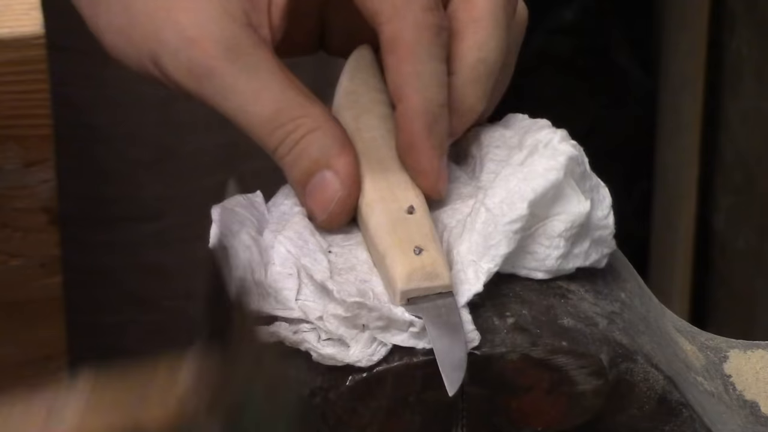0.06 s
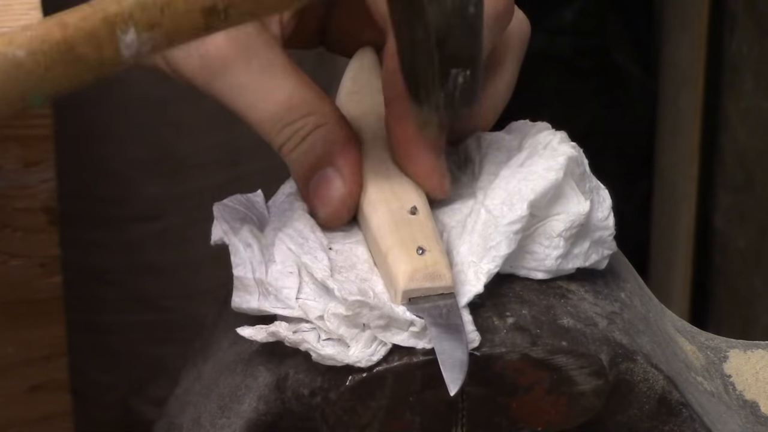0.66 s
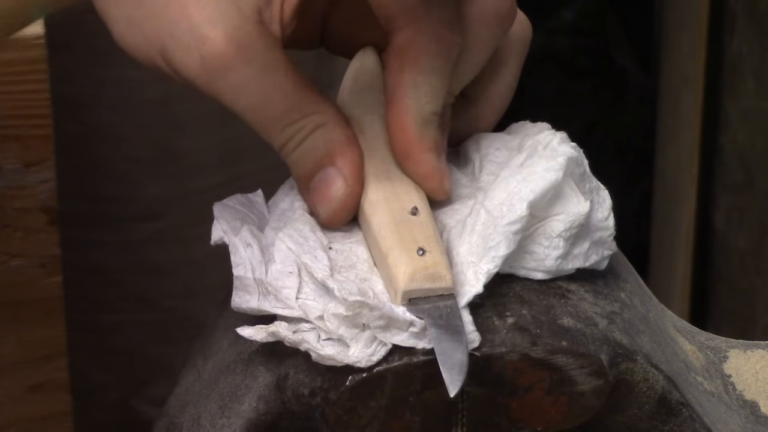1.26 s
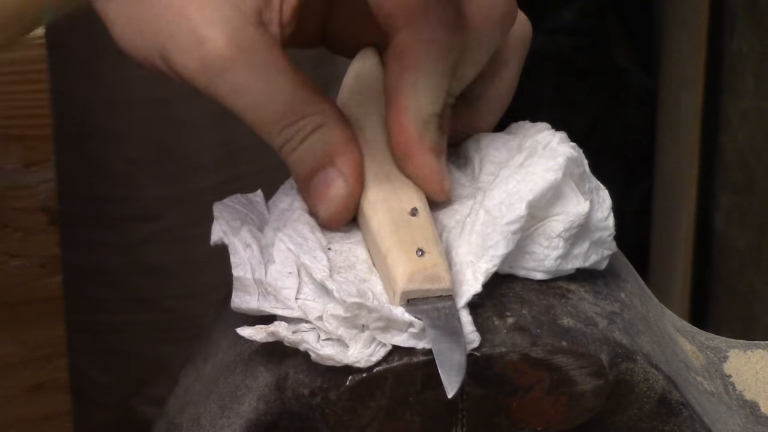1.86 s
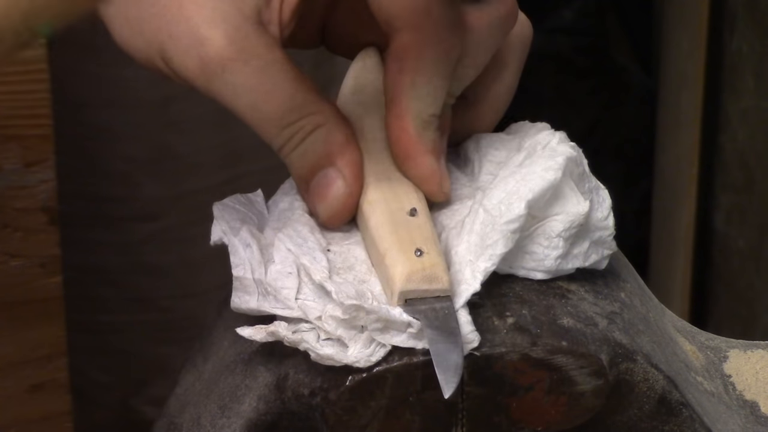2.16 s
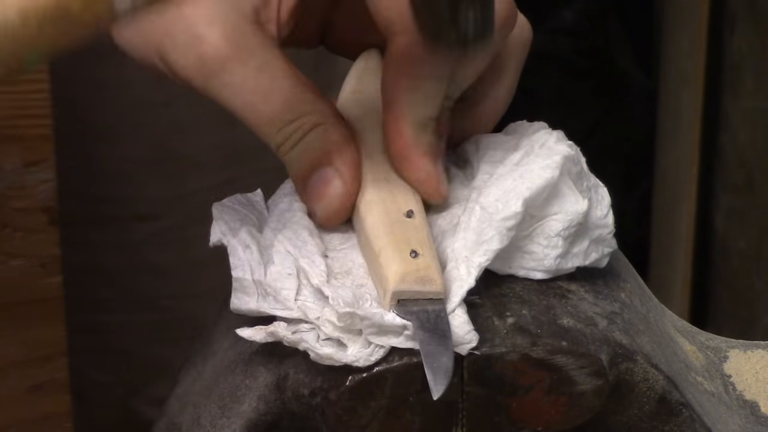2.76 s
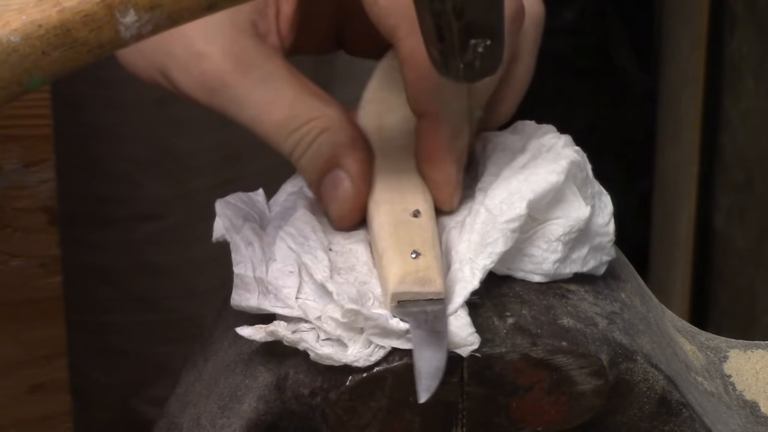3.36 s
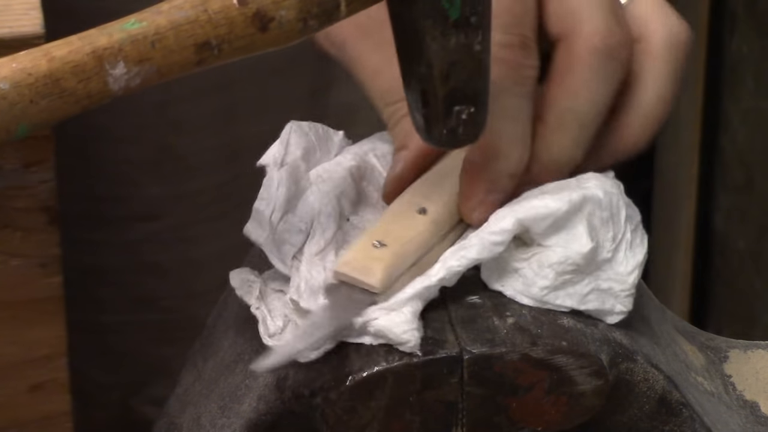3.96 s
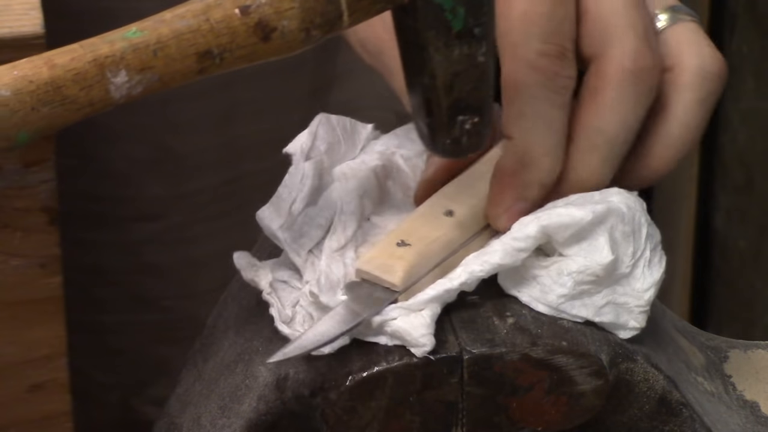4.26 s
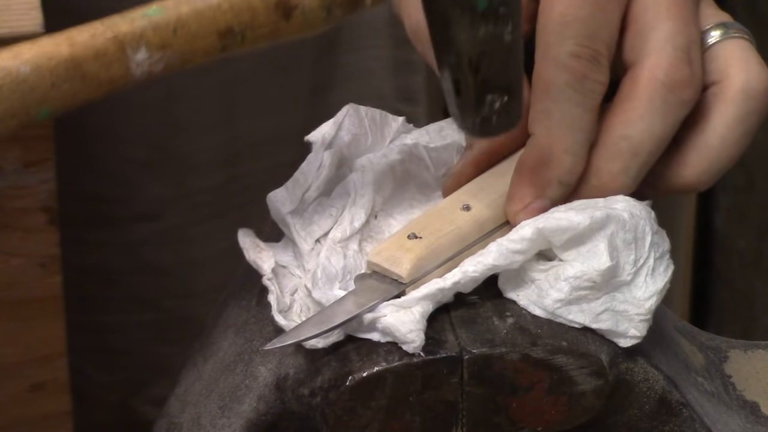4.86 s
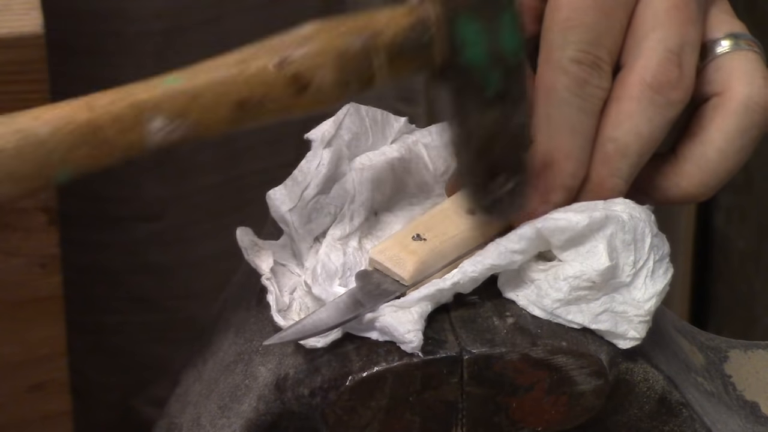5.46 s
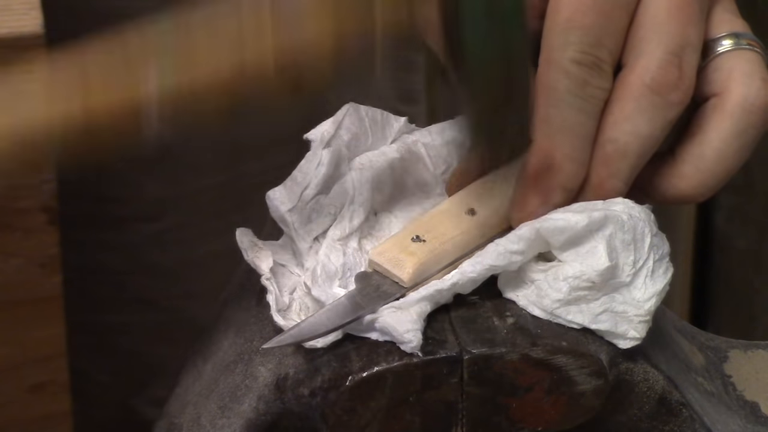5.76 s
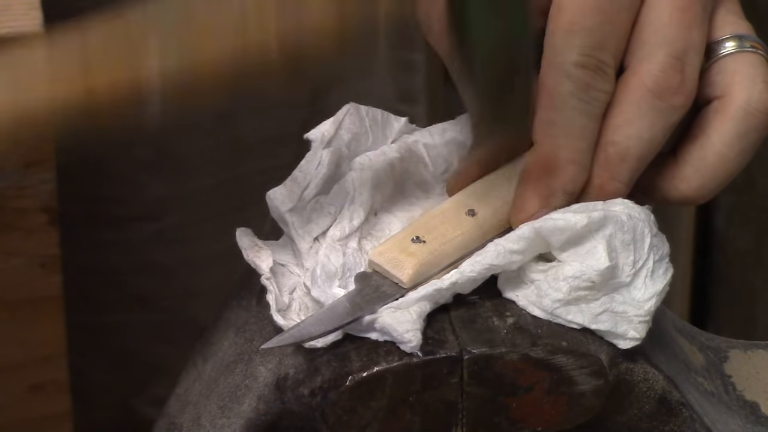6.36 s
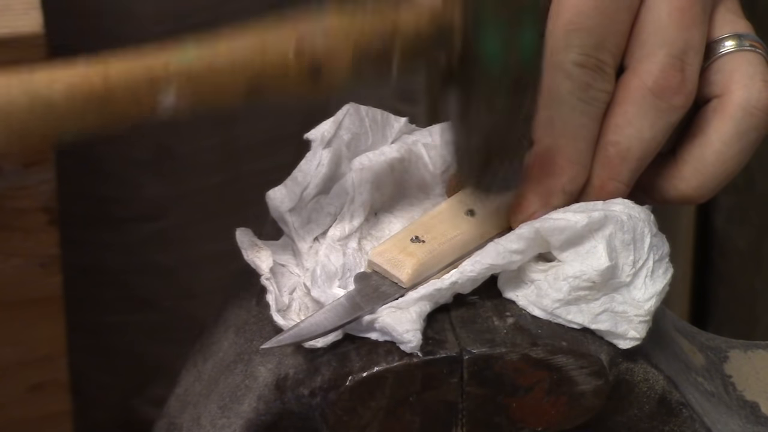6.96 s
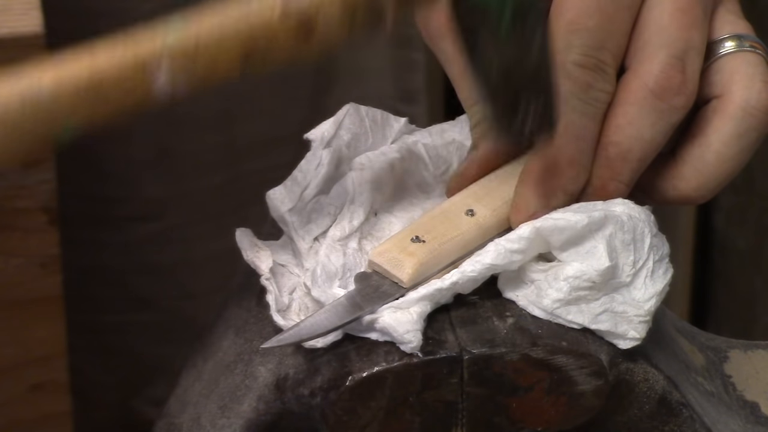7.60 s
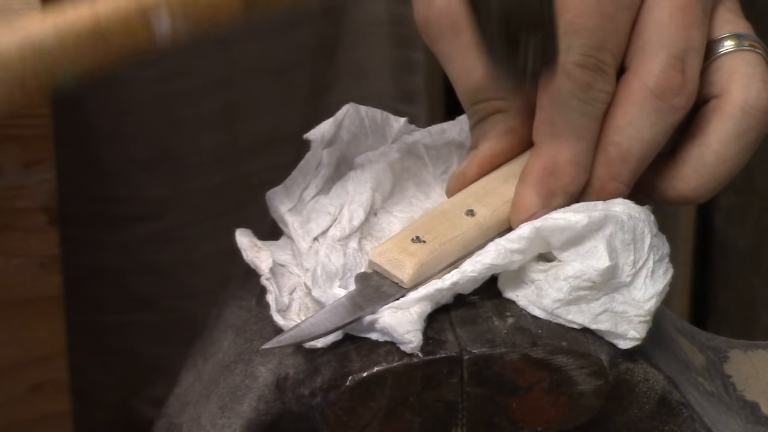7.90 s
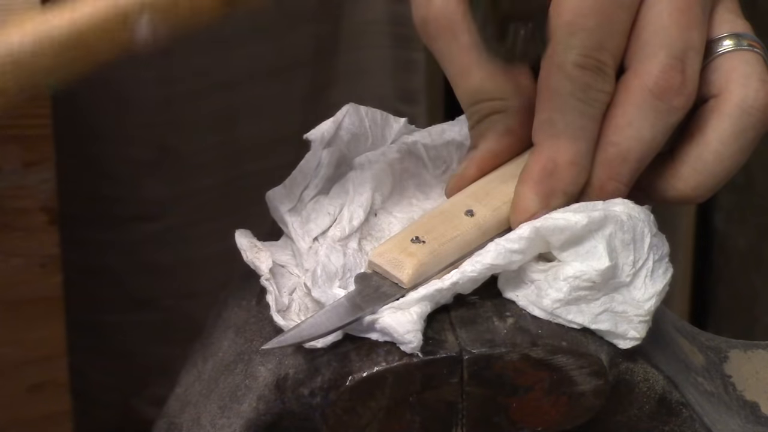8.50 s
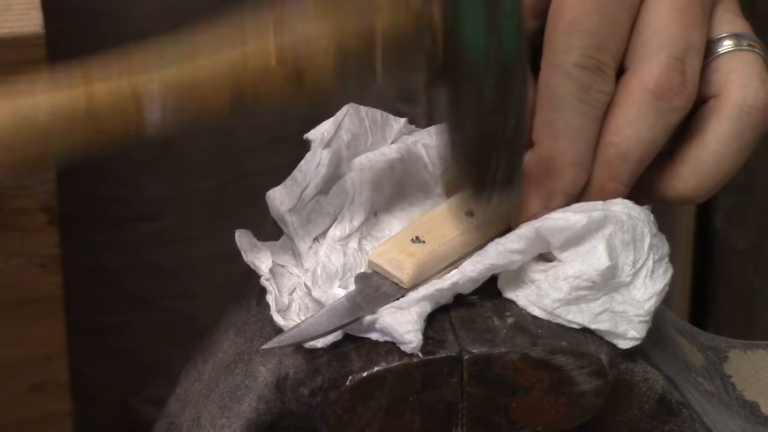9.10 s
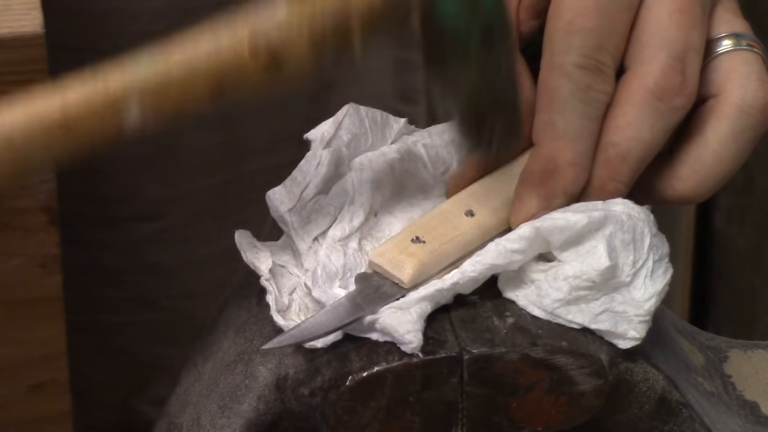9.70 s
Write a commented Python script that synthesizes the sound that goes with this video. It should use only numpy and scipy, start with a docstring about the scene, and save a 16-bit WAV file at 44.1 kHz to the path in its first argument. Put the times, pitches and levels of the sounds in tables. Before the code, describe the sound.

At the start, fingers rub softly and steel scrapes lightly as a knife is laid on a paper towel on a bench vise. From about 0.8 to 2.9 seconds, a small hammer strikes a metal pin in the wooden handle eight times, roughly three blows a second. Each is close and loud: a sharp woody crack, a low bench thump and a thin steel ring, with a short workshop reverberation. From 3 to 5 seconds the handle is turned, with quiet paper rustling, dull finger rubs, a very faint whine and one tiny squeak near 4.1 seconds. A light tap comes at 5.2 seconds. From 5.5 to 9.7 seconds, sixteen slightly faster blows land on the second pin, evenly paced but varying a little in strength and brightness. Faint background hiss sinks under the loud blows and slowly returns.

```python
"""A soft rub of fingers and a light steel scrape: a knife is laid on a paper towel on a bench vise.
A small hammer then peens two metal pins in its wooden handle, one run of blows each.
Each blow thumps the bench, cracks in the wood and leaves a thin steel ring; a small workshop answers.
Between the runs the handle is turned on the paper, with a rustle, a faint whine and one squeak.
Gain control ducks the loud blows, so the background hiss sinks and returns."""
import sys
import numpy as np
from scipy import signal
from scipy.fft import rfft, irfft, next_fast_len
from scipy.io import wavfile
from scipy.ndimage import uniform_filter1d

SR = 44100
rng = np.random.default_rng(int(sys.argv[2]) if len(sys.argv) > 2 else 0)


def master_out(mix):
    """Clip the mix to full scale and print it as 16-bit PCM to the path in sys.argv[1]."""
    frames = np.transpose(np.atleast_2d(mix))
    ceiling = np.clip(frames, -1, 1)
    pcm = np.round(ceiling * 32767).astype(np.int16)
    wavfile.write(sys.argv[1], SR, pcm)


N = 429534
TIME_S = np.arange(N) / SR
AGE_S = np.arange(int(1.2 * SR)) / SR  # time since a blow


def amp(db):
    """Decibels to gain."""
    return 10 ** (np.asarray(db) / 20)


def add(mix, start_s, sound):
    """Mixes a sound in at start_s."""
    part = mix[round(start_s * SR):][:len(sound)]
    part += sound[:len(part)]


def colour(x, hz, gains):
    """Filters x by gains joined on a log-frequency axis."""
    size = next_fast_len(len(x))
    bins_hz = np.fft.rfftfreq(size, 1 / SR)
    response = np.interp(np.log(bins_hz + 1), np.log(hz), gains)
    return irfft(rfft(x, size) * response, size)[:len(x)]


def noise(spectrum):
    """Steady shaped noise, rms 1."""
    hz, db = np.transpose(spectrum)
    grid_hz = np.geomspace(10, SR / 2, num=400)
    gains = amp(np.interp(np.log(grid_hz), np.log(hz), db))
    x = colour(rng.standard_normal(N), grid_hz, gains)
    return x / x.std()


def strokes(rows, fullness=0.87):
    """Envelope of hand movements: from rest to peak speed and back."""
    out = np.zeros(N)
    for start_s, length_s, db, crest in rows:
        peak_s = start_s + length_s * np.clip(crest, .05, .95)
        progress = np.interp(TIME_S, [start_s, peak_s, start_s + length_s], [0, .5, 1])
        out += amp(db) * abs(np.sin(np.pi * progress)) ** fullness
    return out


def friction(resonances):
    """Friction noise singing in narrow resonances."""
    out = 0
    for hz, width_hz, db in resonances:
        band = signal.lfilter(*signal.iirpeak(hz, hz / width_hz, fs=SR), rng.standard_normal(N))
        out += amp(db) * band / band.std()
    return out


def burst(bands):
    """Noise burst; each band has its own energy and decay."""
    hz, db, t60_s = np.transpose(bands)
    grain = rng.choice([-1., 1.], len(AGE_S))
    out = 0
    for band, gain, rate in zip(np.eye(len(hz)), amp(db), np.log(1000) / t60_s):
        decay = np.sqrt(2 * rate / SR) * np.exp(-rate * AGE_S)  # unit energy
        out += gain * decay * colour(grain, hz, band)
    return out


def ring(modes, travel_s=0):
    """Damped modes; low bending waves arrive later (travel_s: delay at 1 kHz)."""
    out = 0
    for hz, db, t60_s in modes:
        t = np.maximum(AGE_S - travel_s * np.sqrt(1000 / hz), 0)
        out += amp(db) * np.exp(-np.log(1000) * t / t60_s) * np.sin(2 * np.pi * hz * t)
    return out


# noise floor: (frequency [Hz], relative density [dB])
AIR_SPECTRUM = [(40, -6.5), (60, 3), (90, -10.5), (120, -1.5), (170, -11.5), (380, -18.5), (800, -24),
                (2600, -28), (6000, -33), (10000, -36.5), (16000, -37.5)]
def air(level_db=-56.5):
    """The quiet shop and the microphone's hiss."""
    return amp(level_db) * noise(AIR_SPECTRUM)


# grip shifts: (start [s], length [s], relative level [dB], crest position [0-1])
GRIP_STROKES = [(0.0, 0.2, -53, 0), (3.82, 0.53, -57.5, 0.18), (4.52, 0.49, -59.5, 0.38)]
# finger friction: (frequency [Hz], relative density [dB])
GRIP_SPECTRUM = [(100, -27), (200, 3), (320, 5.5), (700, -6.5), (1500, -13.5), (3000, -26)]
def finger_rub(gain_db=-1):
    """Fingers shift their grip with a dull rub."""
    return amp(gain_db) * strokes(GRIP_STROKES) * noise(GRIP_SPECTRUM)


# handle slides: (start [s], length [s], relative level [dB], crest position [0-1])
SLIDE_STROKES = [(0.0, .14, -68.5, .5), (3.195, 0.1, -54, 0.38), (3.38, 0.13, -60.5, .6),
                 (3.545, 0.022, -64.5, 0.4), (3.66, 0.14, -55, .6), (3.77, 0.3, -54.5, 0.16),
                 (4.11, 0.15, -52, 0.7), (4.22, 0.19, -64.5, .4), (4.41, 0.06, -65, 0.37),
                 (4.61, 0.096, -66.5, .5), (4.71, 0.16, -57, .75)]
# paper friction: (frequency [Hz], relative density [dB])
PAPER_SPECTRUM = [(530, -38), (900, -19), (1040, -9.5), (2140, -11.5), (2360, -5.5), (2830, -5),
                  (3510, -2.5), (13000, -23), (16000, -31)]
def towel_rustle(gain_db=1.5, grain_db=2):
    """Paper fibres catch and slip under the handle."""
    catch = uniform_filter1d(rng.standard_normal(N), size=150)
    flicker = amp(gain_db + grain_db * catch / catch.std())
    return flicker * strokes(SLIDE_STROKES) * noise(PAPER_SPECTRUM)


# blade movement: (start [s], length [s], level [dB], crest position [0-1])
SCRAPE_STROKES = [(0.16, 0.027, -57.5, .45)]
# scrape resonances: (frequency [Hz], width [Hz], relative level [dB])
SCRAPE_BANDS = [(3940, 250, -1), (5222, 300, -9), (7600, 400, -9)]
def blade_scrape():
    """Steel scrapes lightly as the knife is laid down."""
    return strokes(SCRAPE_STROKES) * friction(SCRAPE_BANDS)


LEAD_SAMPLES = 16  # push onset to peak
def contact(tilt_db_oct, clink_hz, clink_db, chatter_hz=4200, chatter_s=.0016, size=384):
    """The hammer face's short push: tilted treble, one favoured band, fresh chatter every blow."""
    hz = np.fft.rfftfreq(size, 1 / SR)
    chatter = rng.standard_normal(size) * np.exp(-np.arange(size) / SR / chatter_s)
    chatter_share = hz ** 2 / (hz ** 2 + chatter_hz ** 2) / 3
    push = np.sqrt(1 - chatter_share) + np.sqrt(chatter_share) * rfft(chatter / np.linalg.norm(chatter))
    treble_db = tilt_db_oct * np.log2(np.hypot(1, hz / 2500))  # corner 2500 Hz
    band_db = clink_db * np.exp(-(np.log2((hz + 1) / clink_hz) / .35) ** 2)  # width 0.35 octave
    return np.roll(irfft(push * amp(treble_db + band_db)), LEAD_SAMPLES)


# padded vise: (frequency [Hz], relative level [dB], t60 [s])
THUD_MODES = [(340, -8.5, 0.024)]
# bench carrying the vise: (frequency [Hz], relative level [dB], t60 [s])
BENCH_MODES = [(72.5, -19.5, 0.2), (92.8, -34, 0.587), (115.7, -13.5, 0.24), (160, -16.0, 0.13),
               (213, -16, 0.056), (235.5, -4, 0.054), (326.5, -27.5, 0.3), (361, -10.5, 0.029),
               (395.7, -21, 0.14), (428.8, -6.5, 0.025), (539, -23, 0.1), (607.7, -4.0, 0.033),
               (663.7, -14.5, 0.099), (775, -18.5, 0.093), (1041, -18.5, 0.092), (1132, -18.5, 0.069)]
def bench_thump(travel_s=0.00082):
    """The vise thuds and the bench bends; neighbouring modes swing in opposite directions."""
    bending = sum((-1) ** k * ring([mode], travel_s) for k, mode in enumerate(BENCH_MODES))
    return ring(THUD_MODES) + bending


# dense modes of wood and bench: (frequency [Hz], relative density [dB], t60 [s])
CRACK_BANDS = [(100, 3.5, 0.064), (398, 22, 0.031), (724, 14.5, 0.078), (1200, 19, 0.055),
               (1650, 22, 0.073), (1852, 22.5, 0.08), (2840, 19.5, .06), (3080, 22.5, 0.081),
               (4050, 20.5, 0.082), (4680, 14.5, 0.063), (5940, 11.5, 0.07), (7190, 5, 0.019),
               (9400, 5, 0.04), (12600, -4.5, 0.04), (16000, -9, .04)]
# handle modes, one list per pin: (frequency [Hz], relative level [dB], t60 [s])
HANDLE_MODES = [
    [(1270, -23.5, 0.093), (1372, -26.5, 0.16), (1563, -22.5, .07), (1728, -17, 0.047), (1792, -20, 0.086),
     (2410, -27, 0.035), (2700, -22, 0.031), (3116, -28.5, 0.072), (3526, -35, 0.08), (3500, -32.5, 0.049),
     (4396, -24, 0.072), (5776, -34.5, 0.046)],
    [(1530, -24.5, 0.091), (1750, -41.5, 0.055), (1921, -22.5, 0.13), (2133, -27.5, 0.14),
     (2390, -9.5, 0.014), (3410, -40, 0.1), (3770, -17, 0.093), (4130, -29.5, 0.046), (4400, -25, 0.024),
     (4490, -15.5, 0.023)],
]
def wood_crack(pin, rise_s=0.00058):
    """The blow spreads through the wood; the handle's modes depend on how it lies."""
    swell = 1 - np.exp(-AGE_S / rise_s)
    return swell * burst(CRACK_BANDS) + ring(HANDLE_MODES[pin], travel_s=0.001671)


# blade and vise jaws: (frequency [Hz], relative level [dB], t60 [s])
STEEL_MODES = [(590, -60.5, 3.1), (7100, -52, .2), (7257, -56.5, 0.25), (8200, -52.5, 0.28),
               (9010, -55, 0.26), (13000, -51, 0.17), (13810, -54.5, .2)]
def steel_ring():
    """Blade and jaws ring thinly after a blow."""
    return ring(STEEL_MODES)


# diffuse tail: (frequency [Hz], relative density [dB], t60 [s])
TAIL_BANDS = [(51.6, 11.5, 0.32), (95, 23.5, 1.8), (123, 26.5, 1.6), (252, 26.5, 0.56), (454, 23.5, 0.38),
              (636, 24.5, 0.48), (910, 20.5, 0.37), (1530, 10.5, 0.47), (2130, 10, 0.41), (2760, 5, 0.4),
              (3600, 10, 0.4), (4820, 3.5, 0.36), (6300, -2, 0.26), (7300, -9.5, 0.52), (10400, -1.5, 0.11),
              (15000, -20.5, .18)]
# standing waves: (frequency [Hz], relative level [dB], t60 [s])
WALL_MODES = [(56.93, -36.5, 1.5), (75.35, -39, 1.1), (116.1, -34, 0.6), (141.6, -39, 1.2),
              (146, -42.5, 1.6), (194.7, -39, .7), (217, -41.5, 1.5), (255, -37.5, 0.67)]
def workshop(gap_s=0.011, build_s=0.031):
    """A tail builds once the walls are reached; standing waves boom between them."""
    tail = burst(TAIL_BANDS) * (1 - np.exp(-(AGE_S / gap_s) ** 2))
    boom = ring(WALL_MODES) * (1 - np.exp(-AGE_S / build_s))
    return tail + boom


# blows: (time [s], force [dB], treble tilt [dB/octave], clink [Hz], clink gain [dB],
#         head ring gain [dB], pin [index])
HAMMER_BLOWS = [(0.774, -3, -0.5, 1640, -9, -25, 0.0), (1.0824, -2.5, 0.3, 6500.0, 0.5, -13.5, 0.0),
                (1.3807, -1.5, 0.4, 3860, 2, -10, 0.0), (1.6843, 3, -0.5, 1620, 0.5, -15, 0.0),
                (1.9893, 0.5, 0, 1700.0, -1.5, -10.5, 0.0), (2.3024, -1.5, 1.7, 1700.0, -2, -22, 0.0),
                (2.6044, 3, 2, 2247, 4, -8.5, 0.0), (2.917, -0.5, 2.5, 2210, 6, -38.5, 0.0),
                (5.2129, -25.5, -0.5, 2830, 8.5, -45, 1.0), (5.485, -2.5, -1.3, 2400, 3, -12.5, 1.0),
                (5.8183, -1, -0.5, 2660, -0.5, -9.5, 1.0), (6.1318, 0.5, -0.9, 4120, 3.5, -6.5, 1.0),
                (6.4212, 0, -1.1, 4000, 5, -11.5, 1.0), (6.7063, 2.5, -2.4, 2400, 2.5, -40, 1.0),
                (6.9878, 0, 0.7, 4620.0, 2.5, -10, 1.0), (7.2825, -1, 0, 6500.0, 4, -6.5, 1.0),
                (7.5467, 1.5, -0.5, 2460, 4.5, -18, 1.0), (7.8099, 0.5, 0.4, 1950.0, 2, -14.5, 1.0),
                (8.0811, -0.5, 0.8, 2390, 2, -17, 1.0), (8.3433, 1, -0.5, 4220.0, -0.5, -4, 1.0),
                (8.6147, -1, 0.8, 3260, 2.0, -5, 1.0), (8.8771, -5.5, -0.3, 5670, 8, -15.0, 1.0),
                (9.147, -4, -0.3, 1720, 0.5, -15, 1.0), (9.41, 1, 0.9, 3680.0, 3.5, -10, 1.0),
                (9.6855, -2.5, 2.5, 3040, 3, -13, 1.0)]
# hammer head: (frequency [Hz], relative level [dB], t60 [s])
HEAD_MODES = [(7900, -21.5, 0.17), (7908, -35.5, 0.27)]
def hammer():
    """Each push drives bench, steel, wood and room; the head rings according to how its face lands."""
    pushes = np.zeros((len(HANDLE_MODES), N))
    out = np.zeros(N)
    head = ring(HEAD_MODES)
    for time_s, force_db, tilt_db_oct, clink_hz, clink_db, head_db, pin in HAMMER_BLOWS:
        push = amp(force_db) * contact(tilt_db_oct, clink_hz, clink_db)
        add(pushes[round(pin)], time_s - LEAD_SAMPLES / SR, push)
        add(out, time_s, amp(head_db) * head)
    surroundings = bench_thump() + steel_ring() + workshop()
    for pin, run in enumerate(pushes):
        out += signal.fftconvolve(run, surroundings + wood_crack(pin))[:N]
    return out


# whine swells: (start [s], length [s], level [dB], crest position [0-1])
WHINE_SWELLS = [(2.9, 1.3, -67, .4), (4.39, 0.24, -64, 0.48)]
def whine(hz=1561):
    """A faint tone comes and goes while the handle is turned."""
    return strokes(WHINE_SWELLS) * np.sin(2 * np.pi * hz * TIME_S)


# handle twist: (start [s], length [s], level [dB], crest position [0-1])
SQUEAK_STROKES = [(4.115, 0.094, -57, 0.2)]
# squeak resonance: (frequency [Hz], width [Hz], relative level [dB])
SQUEAK_BANDS = [(2330, 65, -1.5)]
def handle_squeak():
    """The turning handle squeaks once on the paper."""
    return strokes(SQUEAK_STROKES) * friction(SQUEAK_BANDS)


def scene(blow_gain_db=4.5):
    """Blows and knife handling over the shop's air, mono."""
    blows = amp(blow_gain_db) * hammer()
    handling = towel_rustle() + finger_rub() + blade_scrape() + whine() + handle_squeak()
    return (blows + handling + air())[None]


def gain_control(x, limit_db=-9.5, recover_db_per_s=3, window_samples=882):
    """Gain drops just ahead of a loud blow, then creeps back."""
    power_ahead = uniform_filter1d(x[0] ** 2, window_samples, origin=-(window_samples // 2))
    over_db = np.maximum(10 * np.log10(abs(power_ahead) + 1e-12) - limit_db, 0)
    recovery_db = recover_db_per_s * TIME_S
    cut_db = np.maximum.accumulate(over_db + recovery_db) - recovery_db
    return x * amp(-cut_db)


def record(dry, low_hz=62, high_hz=16000, ceiling=0.85):
    """Microphone bass cut, gain control, soft clip, band limit."""
    highpass = signal.butter(10, low_hz, "high", fs=SR, output="sos")
    levelled = gain_control(signal.sosfilt(highpass, dry))
    rounded = levelled / (1 + (levelled / ceiling) ** 6) ** (1 / 6)
    lowpass = signal.firwin(255, high_hz, window=("kaiser", 9), fs=SR)
    return signal.oaconvolve(rounded, lowpass[None], "same")


dry = scene()
out = record(dry)
master_out(out)
```